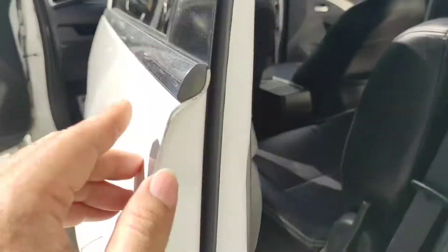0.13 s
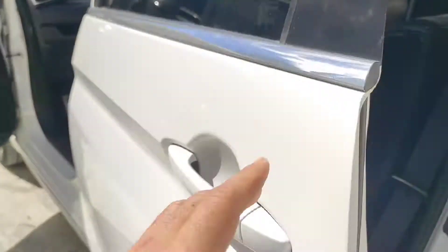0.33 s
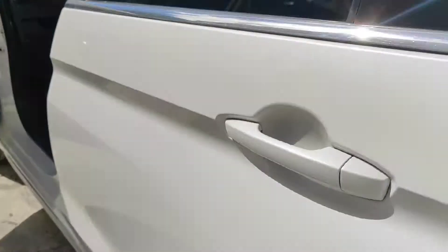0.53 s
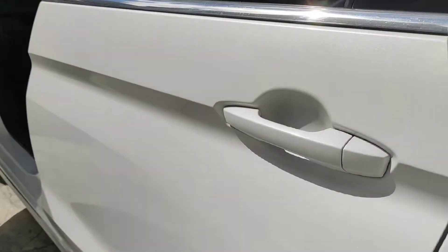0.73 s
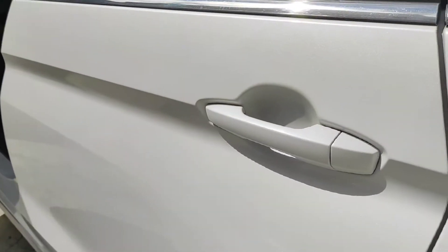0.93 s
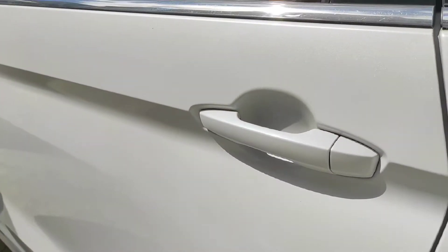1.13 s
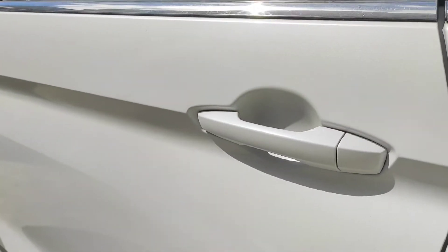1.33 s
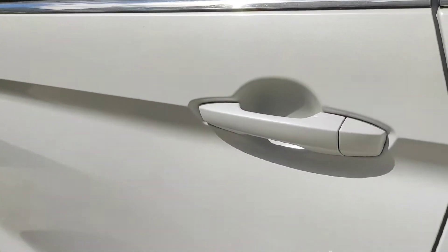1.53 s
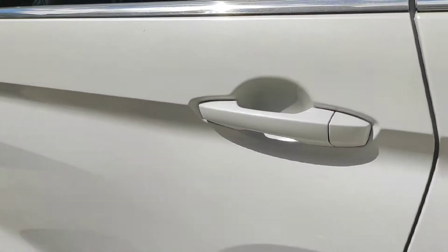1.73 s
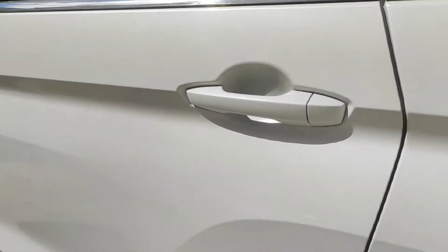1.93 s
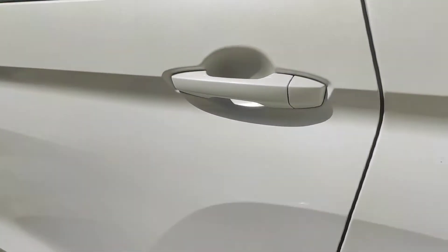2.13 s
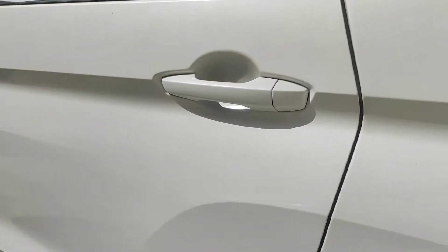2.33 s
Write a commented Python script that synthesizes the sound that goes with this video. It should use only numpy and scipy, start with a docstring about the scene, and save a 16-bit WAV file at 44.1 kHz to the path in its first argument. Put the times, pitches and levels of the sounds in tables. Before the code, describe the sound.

After a brief quiet moment of low outdoor rumble, a car door slams solidly with a steel latch snap and a dull short echo, followed by soft wind-like rumble and small gritty footstep scrapes, recorded close in stereo.

```python
"""Close by on an open lot, low rumble and two faint machine whines run throughout: banded noise, wavering sines.
A faint shoe scuff comes first. At 0.65 s a car door is pushed shut: blows ring the door and body modes,
the latch snaps over its striker in noise cracks and steel tones, the cabin booms, a dull echo follows.
From about 1.7 s the rumble swells; from 2.1 s a shoe scuffs on gritty concrete: hiss, ringing grains, cracks.
"""
import sys
import numpy as np
from scipy import signal
from scipy.io import wavfile

SR = 44100
rng = np.random.default_rng(int(sys.argv[2]) if len(sys.argv) > 2 else 0)


def to_wav(sig):
    """Store sig (one row per channel, or 1-D mono) as 16-bit WAV at the path in sys.argv[1].

    Samples outside -1..1 are clipped; the rate is SR.
    """
    pcm = np.clip(np.atleast_2d(sig), -1, 1) * 32767
    pcm = np.round(pcm).astype(np.int16)
    wavfile.write(sys.argv[1], SR, pcm.T)  # frames by channels


N = 109853
T = np.arange(N) / SR

# Noise spectra. Each row: frequency in Hz, relative density in dB per Hz.
LOT_SPECTRUM = [(25, -13), (50, -11), (80, -0.5), (108, -8), (150, -2), (270, -9.5), (500, -18.5),
                (780, -26.5), (950, -23.5), (1100, -22.5), (1400, -32.5), (1750, -23.5), (2200, -25.5),
                (3100, -31.5), (4500, -28), (7500, -34.5), (9000, -29.5), (10000, -53), (12700, -39.5),
                (14000, -52)]
SWELL_SPECTRUM = [(30, -13), (50, -20), (75, -4.5), (120, 1.5), (220, -3), (400, -10.5), (650, -17),
                  (1000, -28), (2500, -31), (8000, -37.5), (11000, -72)]
RUSH_SPECTRUM = [(100, -27), (280, -4), (450, 1.5), (660, -3.5), (900, -28), (2000, -16.5), (6000, -61)]
DEEP_SPECTRUM = [(25, 0), (40, 0), (70, -6), (110, -16), (300, -60), (1000, -90)]
SCUFF_SPECTRUM = [(300, 10), (1300, -5), (3100, -4.5), (4500, 3), (8500, -0.5), (10500, -1), (14000, -14)]
GRIT_SPECTRUM = [(300, -4), (900, 1), (1500, 0), (2600, 3), (3500, 0), (4500, -7), (6500, -6), (9000, -12),
                 (14000, -30)]
BODY_SPECTRUM = [(30, -16), (80, 1), (150, 2), (270, 4), (400, -1.5), (580, -8), (950, 0), (1250, -12),
                 (1600, -2.5), (2500, -22), (5000, -66)]
LATCH_SPECTRUM = [(1000, 5.5), (1800, -3), (2600, 0.5), (3400, -3.5), (4400, -1), (6300, -5), (7800, -4.5),
                  (9200, -2), (11000, -8), (14000, -16)]

# Levels of swelling rumble, low-mid rush and deepest flutter. Each row: time in seconds, level in dB.
SWELL_LEVEL = [(0, -49), (.2, -40.5), (.45, -39), (.6, -45), (.95, -44), (1.14, -37.5), (1.25, -45),
               (1.45, -54), (1.53, -40), (1.7, -40), (1.8, -32), (1.95, -29), (2.09, -32), (2.22, -30.5),
               (2.32, -35), (2.49, -41)]
RUSH_LEVEL = [(0, -50.5), (1.62, -58), (1.74, -36.5), (1.83, -34), (1.95, -40.5), (2.08, -55),
              (2.17, -40.5), (2.3, -46.5), (2.49, -50.5)]
DEEP_LEVEL = [(0, -46), (.5, -63), (.9, -39.5), (1.15, -43.5), (1.55, -44), (2.05, -46), (2.3, -60),
              (2.49, -60)]

# Stereo likeness of noise. Each row: frequency in Hz, left-right correlation (no unit).
LIKENESS = [(30, .7), (80, .93), (200, .94), (430, .78), (720, .15), (1000, .1), (2200, .15), (5000, 0)]
# Stereo balance. Each row: frequency in Hz, left minus right in dB.
BALANCE = [(50, 0), (150, 5.5), (500, 2.5), (2000, 3), (4500, 1.5), (6300, -1.5), (8000, -0.5),
           (11000, -0.5)]
# Far machinery. Each row: frequency in Hz, waver in Hz, level in dB, pan in dB.
WHINES = [(1915, 12, -58.5, 8), (2410, 12, -59, 2)]

# Shoe scuffs. Each row: centre in seconds, length in seconds, grinding level in dB, hiss level in dB.
SCUFFS = [(0.008, 0.05, -51, -42.5), (2.108, 0.042, -38.5, -38.5), (2.165, 0.077, -53.5, -42.5),
          (2.237, 0.11, -48.5, -51), (2.436, 0.081, -40.5, -41)]
# Grit cracks under the sole. Each row: start in seconds, level in dB, t60 in seconds.
GRIT = [(2.0895, -33, .02), (2.111, -33, .02), (2.129, -34, .02), (2.157, -33, .03), (2.1765, -31, .03),
        (2.1978, -23, .016), (2.393, -38, .03), (2.429, -39, .025)]
# Snap at the start of each crack. Each row: frequency in Hz, level in dB.
SNAP_MODES = [(1100, -3), (1750, -3), (2500, -1), (3300, -2), (4900, -6), (6500, -5)]

# Door meets body. Each row: time in seconds, level in dB, contact time in seconds, knock pitch in Hz.
BLOWS = [(0.6493, -18, .0011, 896), (0.6514, -10, 0.00032, 914), (0.657, -13, 0.0032, 736),
         (0.6695, -2.5, 0.00066, 995), (0.677, -32, 0.00048, 770)]
# Modes of door skin and frame. Each row: frequency in Hz, level in dB, t60 in seconds.
DOOR_MODES = [(242, -23, .4), (300, -17, .22), (334, -27, .35), (398, -26, .25), (732, -26, .2),
              (786, -16, .14), (842, -23, .12), (890, -28, .12), (990, -16.5, .125), (1062, -22, .11),
              (1190, -29, .15), (1540, -26, .14), (1792, -31, .16), (2040, -30, .16), (2640, -28, .08)]
# Ringing of the rest of the body. Each row: frequency in Hz, t60 in seconds.
BODY_T60 = [(60, 0.88), (250, 0.45), (500, 0.41), (1000, 0.2), (2500, 0.23), (8000, .12)]
# Latch clicks. Each row: start in seconds, level in dB, treble pan in dB, treble lift in dB.
LATCH_CLICKS = [(0.6499, -18.5, -5, 5), (0.6666, -4, 3, 4.5), (0.6697, 4, 5, -10), (0.6733, -8.5, -10, 3),
                (0.678, -3.5, -12, 1), (0.683, -10, 2, 4.5), (0.689, -8, -3, 0), (0.6973, -13.5, 2, -7),
                (0.71, -13.5, -5, -13), (0.783, -27.5, -8, 8)]
# Modes of latch steel. Each row: frequency in Hz, level in dB, t60 in seconds.
LATCH_MODES = [(1927, -6, .07), (2420, -6, .06), (2760, -6, .06), (4360, -4, .07), (5033, -5, .07),
               (5464, -11, .08), (7047, -7, .07), (7750, -7, .1), (8080, -9, .1), (8635, -10, .08)]
# Cabin air and large panels. Each row: start in seconds, frequency in Hz, level in dB, rise in seconds,
# t60 in seconds.
BOOMS = [(0.6715, 31, -16, .008, .2), (0.7415, 38, -23, .022, .34), (0.813, 34, -30, .02, .16),
         (0.675, 80, -20, .005, .24), (0.6765, 156, -14.5, .026, .05), (0.666, 308, -16.5, .028, .11),
         (0.79, 146, -27, .03, .22)]
# Left and right microphone ports. Each row: resonance in Hz, width in Hz, lift in dB.
PORTS = [(8680, 1150, 4.5), (7510, 670, 9.5)]

LOT_DB, RUMBLE_LAG_S = -37, .00014
WHINE_FLUTTER_DB, WHINE_SKIRT_HZ, WHINE_SKIRT_DB = 3, 90, -2
GRAINS_PER_S, GRAIN_SPREAD_DB, GRAIN_T60_CYCLES = 1800, 4.5, 10
GRAIN_LOW_HZ, GRAIN_HIGH_HZ = 1400, 3300
SNAP_DB, SNAP_RISE_S, SNAP_T60_S = -1, .0003, .008
SCUFF_FLUTTER_DB, SHOE_PAN_DB, SHOE_LAG_S = 1, 5, .0001
KNOCK_DB, KNOCK_RISE_S, KNOCK_T60_S = -1.5, 0.0024, 0.028
BODY_DB, BODY_RISE_S = -17, 0.0035
DOOR_PAN_DB, SKIN_SPREAD_DB, DOOR_LAG_S = 3.5, 1.5, .00016
LATCH_SPLIT_HZ = 6600
STRIKE_SPREAD_DB, CHATTER_DB, CHATTER_HZ = 2, 3, 350
CRACK_DB, CRACK_T60_S, LATCH_RING_DB = -13.5, 0.015, -28
RATTLE_DB, RATTLE_T60_S = -29.5, 0.17
ECHO_DB, ECHO_T60_S, ECHO_DELAY_S, ECHO_CUT_HZ = -27.5, 0.63, 0.025, 1300
OVERLOAD = 2.2  # ceiling of the rounded peaks
SHELF_HZ, SHELF_DB, STOPBAND_HZ = 9280, -16, 15000


def from_db(db):
    """Decibels to gain."""
    return 10 ** (np.asarray(db) / 20)


def rms_one(x):
    """Scale to unit power."""
    return x / np.sqrt(np.mean(x ** 2) + 1e-20)


def at_hz(points, hz):
    """Read a table on a log-frequency axis."""
    table_hz, values = np.transpose(points)
    return np.interp(np.log(hz), np.log(table_hz), values)


def level_over_time(points):
    """Gain curve from a table of times and levels."""
    return from_db(np.interp(T, *np.transpose(points)))


def pan(db):
    """Left and right gains for a level difference."""
    return from_db(np.array([[db], [-db]]) / 2)


def delayed(x, lag_s):
    """Shift by whole samples, wrapping round."""
    return np.roll(x, int(lag_s * SR))


def butter(x, order, hz, kind="low"):
    """Butterworth filter."""
    return signal.sosfilt(signal.butter(order, hz, kind, fs=SR, output="sos"), x)


def drift(rate_hz):
    """Random wander of spread about 1: noise through two equal low-pass poles, drawn every 40 samples."""
    r = np.exp(-80 * np.pi * rate_hz / SR)
    noise = rng.standard_normal(N // 40 + 2002)
    slow = signal.lfilter([1], [1, -2 * r, r * r], noise)[2000:]
    return np.interp(np.arange(N) / 40, np.arange(len(slow)), rms_one(slow))


def decay(start, t60, rise=0.00017):
    """Envelope of a blow: quick rise, exponential fall."""
    age = np.maximum(T - start, 0)
    return (1 - np.exp(-age / rise)) * from_db(-60 * np.minimum(age / t60, 5))


def swing(start, hz, rise, t60):
    """A vibration that builds up smoothly, then dies away."""
    age = T - start
    build = np.sin(np.pi / 2 * np.clip(age / rise, 0, 1)) ** 2
    fall = from_db(-60 * np.clip((age - rise) / t60, 0, 5))
    return build * fall * np.sin(2 * np.pi * hz * age)


def ring(clicks, hz, t60):
    """Two-pole resonator: a unit click sets a decaying sine of height about 1 ringing."""
    r, w = from_db(-60 / (t60 * SR)), 2 * np.pi * hz / SR
    return signal.lfilter([0, np.sin(w)], [1, -2 * r * np.cos(w), r * r], clicks + 1e-18)


def noise_bands(spectrum):
    """Third-octave bands of stereo noise with total power 1: (centres in Hz, bands)."""
    edges = 22 * 2 ** (np.arange(29) / 3)
    centres = np.sqrt(edges[1:] * edges[:-1])
    white = rng.standard_normal((2, 2, N))  # neighbouring bands use different noise
    bands = []
    for k, hz in enumerate(centres):
        mid, side = butter(white[k % 2], 2, edges[k:k + 2], "band")
        alike = np.clip(at_hz(LIKENESS, hz), -.99, .99)
        stereo = np.sqrt(1 + alike) * mid + np.sqrt(1 - alike) * side * [[1], [-1]]
        bands.append(from_db(at_hz(spectrum, hz)) * stereo)
    return centres, np.array(bands) / np.std(sum(bands))


def outdoor_noise(spectrum, patchy_db):
    """Noise whose bands flutter independently, each with its own stereo balance."""
    out = 0
    for hz, band in zip(*noise_bands(spectrum)):
        out = out + band * pan(at_hz(BALANCE, hz)) * from_db(patchy_db * drift(16))
    return out


def lot():
    """Steady rumble and hiss; low noise that swells and sinks, with a soft rush on top and deep flutter below."""
    steady = from_db(LOT_DB) * outdoor_noise(LOT_SPECTRUM, patchy_db=1.42)
    swell = level_over_time(SWELL_LEVEL) * outdoor_noise(SWELL_SPECTRUM, patchy_db=1.0)
    rush = level_over_time(RUSH_LEVEL) * outdoor_noise(RUSH_SPECTRUM, patchy_db=1.5)
    deep = level_over_time(DEEP_LEVEL) * outdoor_noise(DEEP_SPECTRUM, patchy_db=3.5)
    left, right = steady + swell + rush + deep
    return np.array([delayed(left, RUMBLE_LAG_S), right])


def whines():
    """Faint wavering tones of far machinery, each in a narrow skirt of noise."""
    out = 0
    for hz, waver_hz, db, pan_db in WHINES:
        phase = 2 * np.pi * np.cumsum(hz + waver_hz * drift(15)) / SR
        tone = np.sin(phase) * from_db(WHINE_FLUTTER_DB * drift(10))
        skirt_t60 = np.log(1000) / (np.pi * WHINE_SKIRT_HZ)
        skirt = ring(rng.standard_normal((2, N)), hz, skirt_t60)
        out = out + from_db(db) * pan(pan_db) * (rms_one(tone) + from_db(WHINE_SKIRT_DB) * rms_one(skirt))
    return out


def grains():
    """Dense ticks of sand under a sole, each ringing a few cycles at one of 14 pitches."""
    pitches = np.geomspace(GRAIN_LOW_HZ, GRAIN_HIGH_HZ, 14)
    sizes = from_db(GRAIN_SPREAD_DB * np.minimum(rng.exponential(1, N), 3))
    signed = sizes * rng.choice([-1, 1], N)
    ticks = signed * (rng.random(N) < GRAINS_PER_S / SR)
    dealt = rng.integers(0, len(pitches), N)
    out = 0
    for k, hz in enumerate(pitches):
        out = out + hz * ring(ticks * (dealt == k), hz, GRAIN_T60_CYCLES / hz)
    return rms_one(out)


def shoe():
    """The sole grinds over sand, with a thin hiss and single cracks of grit, each led by a modal snap."""
    grind, slide = 0, 0
    for s, length, grind_db, hiss_db in SCUFFS:
        stroke = np.exp(-(2 * (T - s) / length) ** 2)
        grind = grind + from_db(grind_db) * stroke
        slide = slide + from_db(hiss_db) * stroke
    cracks = sum(from_db(db) * decay(s, t60) for s, db, t60 in GRIT)
    grit_noise = rms_one(noise_bands(GRIT_SPECTRUM)[1].sum(axis=0)[0])
    sand = grains() * grind + grit_noise * cracks
    for s, db, _ in GRIT:
        for hz, mode_db in SNAP_MODES:
            sand = sand + from_db(db + SNAP_DB + mode_db) * swing(s, hz, SNAP_RISE_S, SNAP_T60_S)
    hiss = sum(noise_bands(SCUFF_SPECTRUM)[1]) * slide * from_db(SCUFF_FLUTTER_DB * drift(83))
    return hiss + pan(SHOE_PAN_DB) * np.array([sand, delayed(sand, SHOE_LAG_S)])


def door():
    """Soft-edged blows ring the door's modes, a knock through the frame and the dense modes of the body."""
    force, knock = 0, 0
    for s, db, contact, knock_hz in BLOWS:
        push = np.exp(-((T - s) / (contact / np.pi)) ** 2)
        force = force + from_db(db) * push / push.sum()
        knock = knock + from_db(KNOCK_DB + db) * swing(s, knock_hz, KNOCK_RISE_S, KNOCK_T60_S)
    skin = 0
    for k, (hz, db, t60) in enumerate(DOOR_MODES):
        sign = (-1) ** (k + 1)
        skin = skin + sign * from_db(db) * ring(force, hz, t60) * pan(SKIN_SPREAD_DB * rng.normal())
    body = 0
    for hz, band in zip(*noise_bands(BODY_SPECTRUM)):
        t60 = at_hz(BODY_T60, hz)
        power = sum((from_db(db) * decay(s, t60, BODY_RISE_S)) ** 2 for s, db, _, _ in BLOWS)
        body = body + band * np.sqrt(power)
    left, right = skin + knock
    return np.array([left, delayed(right, DOOR_LAG_S)]) + from_db(BODY_DB) * body


def latch():
    """Each click is a noise crack, a short rattle and a ring of small steel parts, with its own treble."""
    hiss = sum(noise_bands(LATCH_SPECTRUM)[1]) * rms_one(from_db(CHATTER_DB * drift(CHATTER_HZ)))
    dull = butter(hiss, 2, LATCH_SPLIT_HZ)
    # half a turn of the noise keeps the two ranges unrelated
    bright = butter(np.roll(hiss, N // 2, axis=1), 2, LATCH_SPLIT_HZ, "high")
    dull_power, bright_power, steel = 0, 0, 0
    for s, db, pan_db, treble_db in LATCH_CLICKS:
        fall = from_db(CRACK_DB) * decay(s, CRACK_T60_S) + from_db(RATTLE_DB) * decay(s, RATTLE_T60_S)
        dull_power = dull_power + (from_db(db) * fall) ** 2
        bright_power = bright_power + (from_db(db + treble_db) * pan(pan_db) * fall) ** 2
    s, db, _, treble_db = np.transpose(LATCH_CLICKS)
    for hz, mode_db, t60 in LATCH_MODES:
        spread_db = STRIKE_SPREAD_DB * rng.standard_normal((len(s), 2)).T
        strength = from_db(db + treble_db * (hz > LATCH_SPLIT_HZ) + spread_db)
        clicks = np.zeros((2, N))
        clicks[:, (s * SR).astype(int)] = strength * rng.choice([-1, 1], (len(s), 2)).T
        steel = steel + from_db(mode_db) * pan(at_hz(BALANCE, hz)) * ring(clicks, hz, t60)
    noise = dull * np.sqrt(dull_power) + bright * np.sqrt(bright_power)
    return noise + from_db(LATCH_RING_DB) * steel


def boom():
    """Cabin air and large panels take up the push of the seals, die away and rock again."""
    return sum(from_db(db) * swing(s, hz, rise, t60) for s, hz, db, rise, t60 in BOOMS)


def echo(x):
    """Dull scatter from the ground and the parked cars: convolution with decaying band noise."""
    noise = butter(rng.standard_normal((2, N)), 2, [200, ECHO_CUT_HZ], "band")
    tail = rms_one(noise * decay(ECHO_DELAY_S, ECHO_T60_S, rise=0.0048)) / np.sqrt(N)
    return from_db(ECHO_DB) * signal.fftconvolve(x, tail, axes=1)[:, :N]


def scene():
    """The lot and the shoe around the door close by."""
    around = lot() + whines() + shoe()
    shut = (door() + boom()) * pan(DOOR_PAN_DB) + latch()
    return around + shut + echo(shut)


def port(x, hz, width_hz, db):
    """A microphone port lifts one narrow band."""
    return x + (from_db(db) - 1) * signal.lfilter(*signal.iirpeak(hz, hz / width_hz, fs=SR), x)


def record(dry):
    """Ports colour the sound, tanh rounds peaks, the top treble steps down, then a steep cut."""
    dry = np.array([port(x, *row) for x, row in zip(dry, PORTS)])
    dry = OVERLOAD * np.tanh(dry / OVERLOAD)
    below = signal.sosfilt(signal.ellip(8, .3, 60, SHELF_HZ, fs=SR, output="sos"), dry)
    above = butter(dry, 6, SHELF_HZ, "high")
    steep_cut = signal.cheby2(12, 70, STOPBAND_HZ, fs=SR, output="sos")
    return signal.sosfilt(steep_cut, below + from_db(SHELF_DB) * above)


dry = scene()
out = record(dry)
to_wav(out)
```